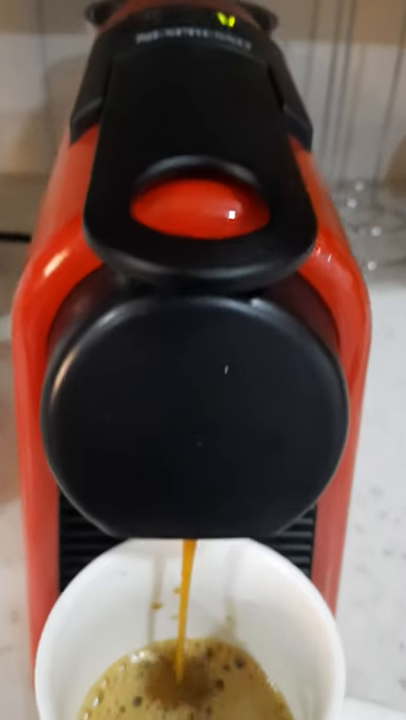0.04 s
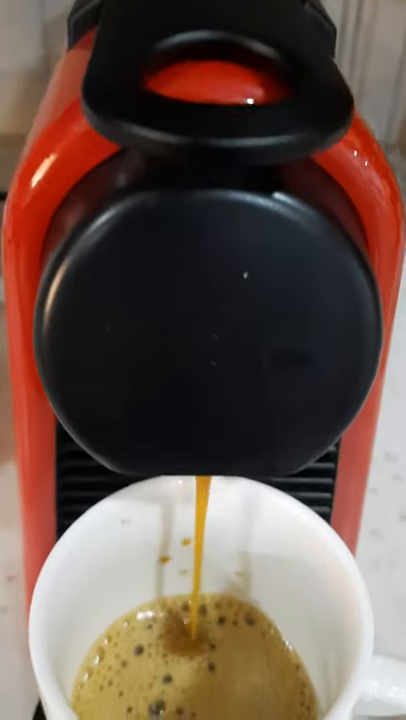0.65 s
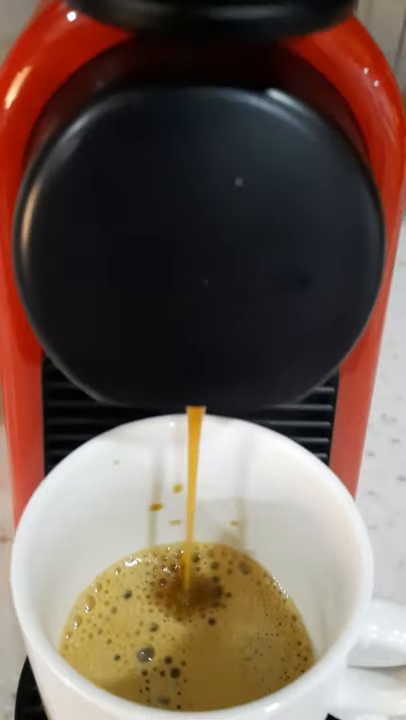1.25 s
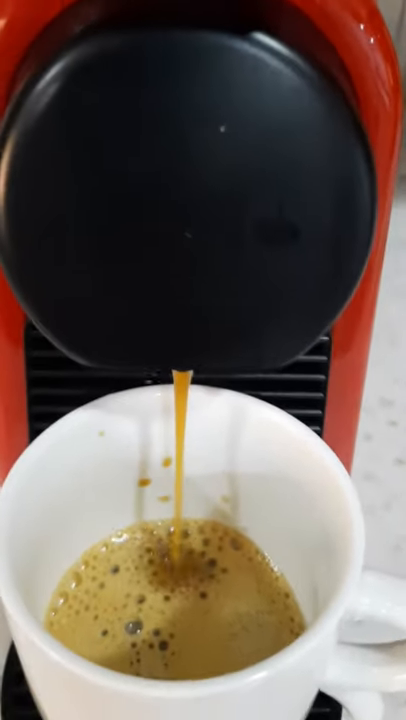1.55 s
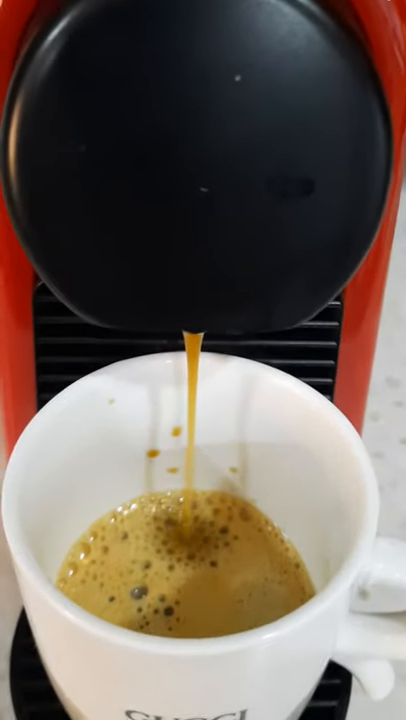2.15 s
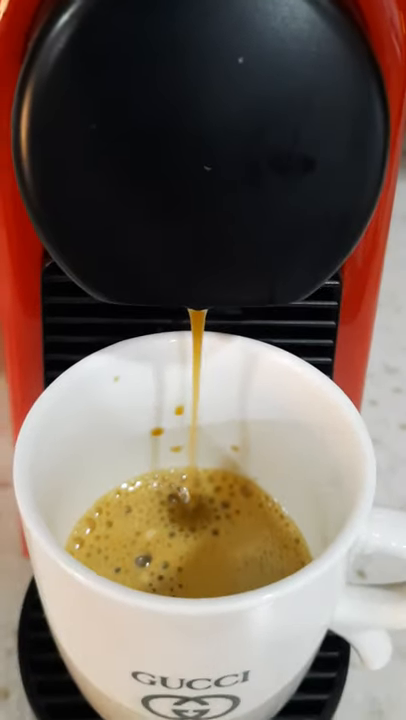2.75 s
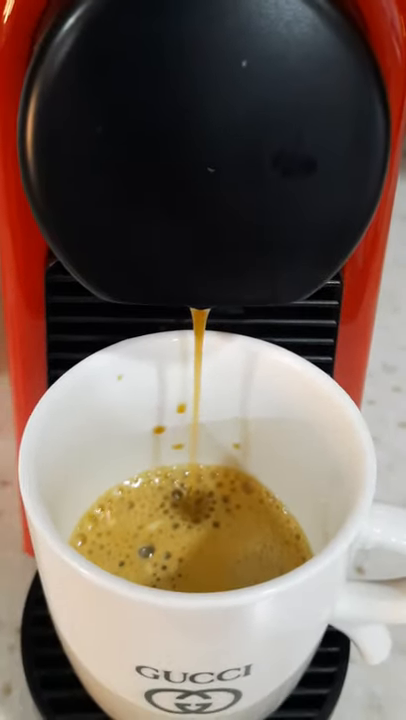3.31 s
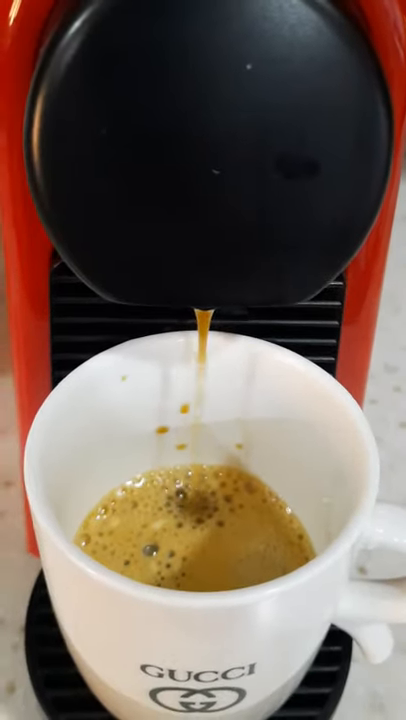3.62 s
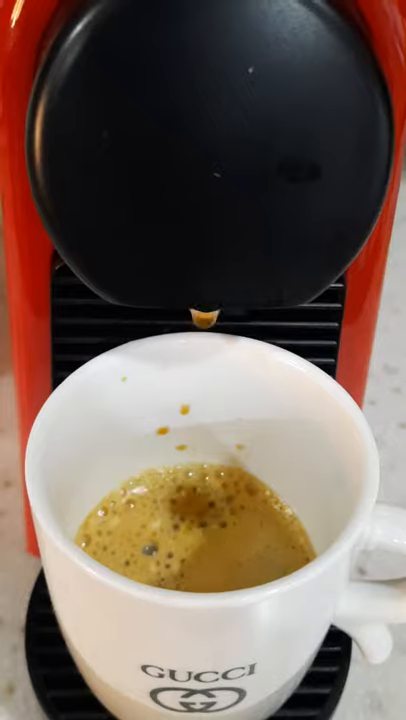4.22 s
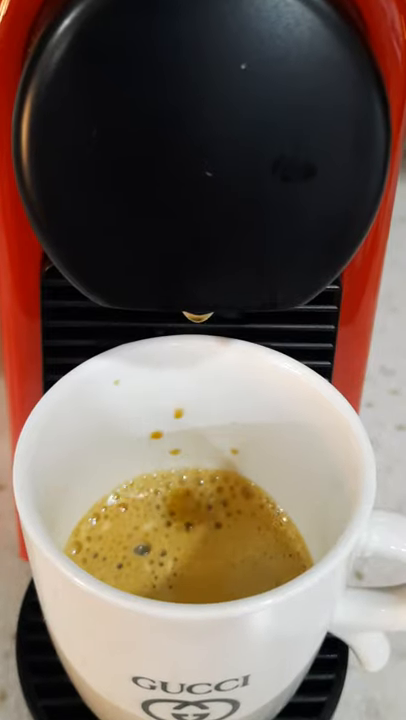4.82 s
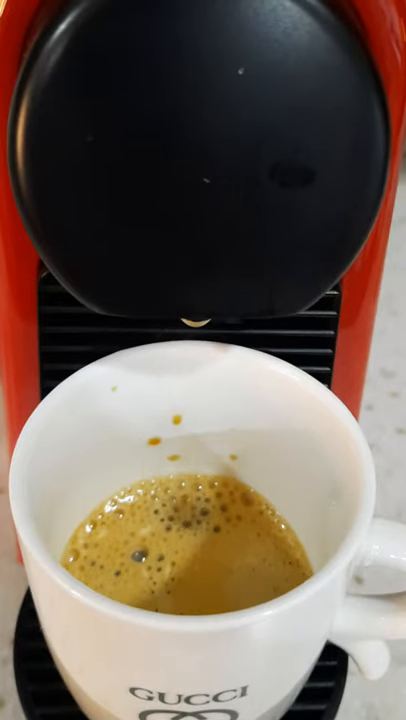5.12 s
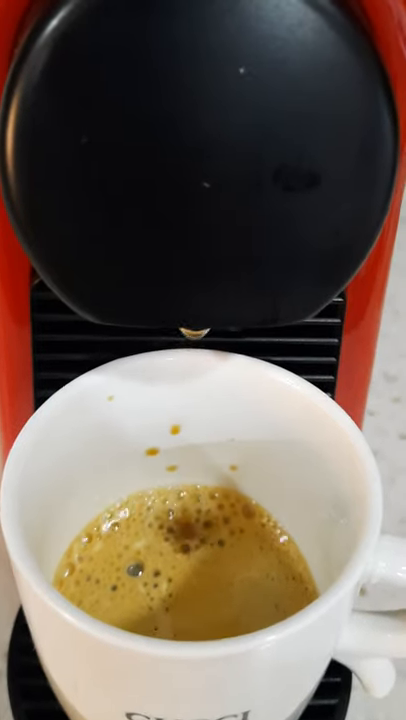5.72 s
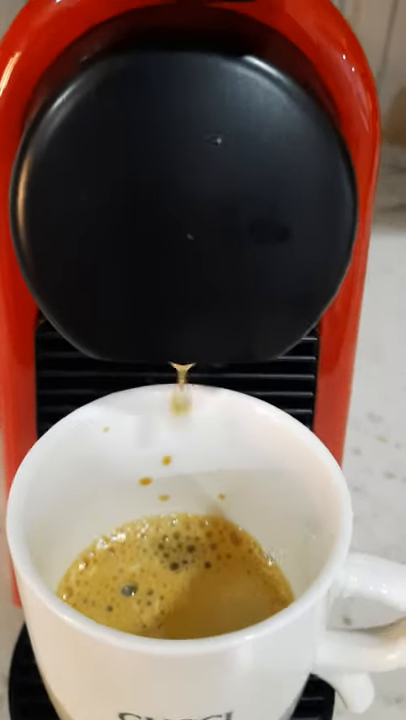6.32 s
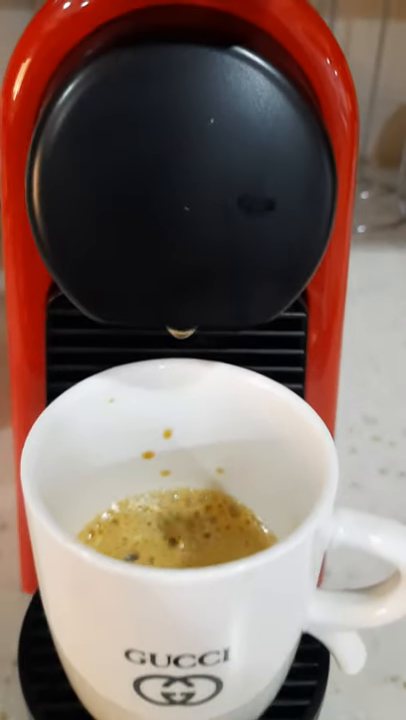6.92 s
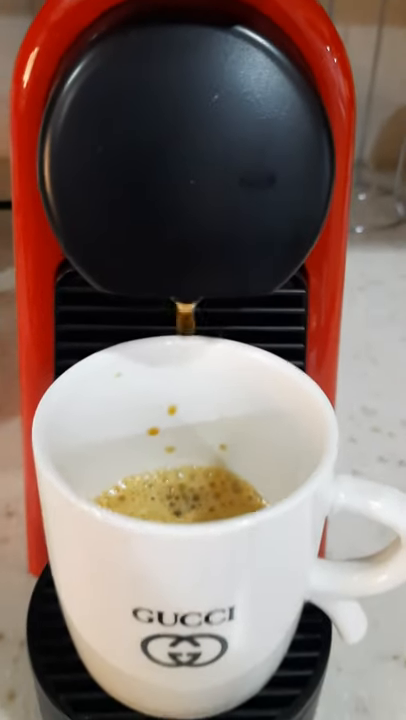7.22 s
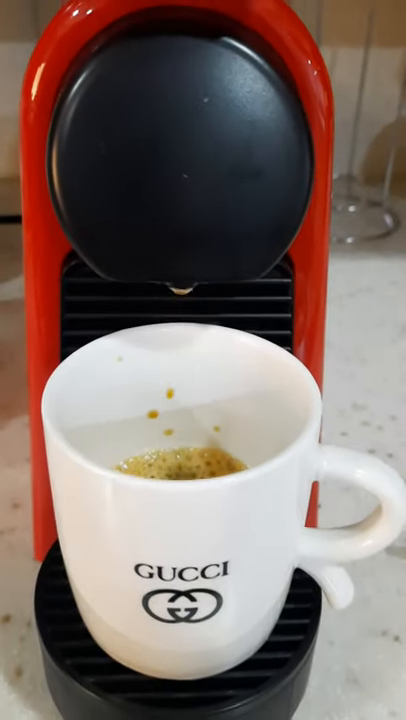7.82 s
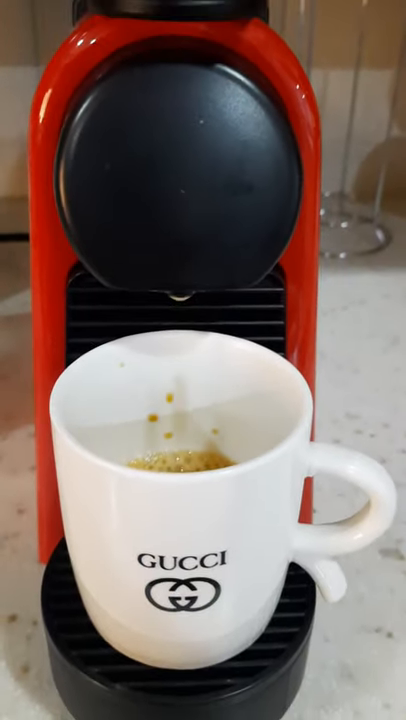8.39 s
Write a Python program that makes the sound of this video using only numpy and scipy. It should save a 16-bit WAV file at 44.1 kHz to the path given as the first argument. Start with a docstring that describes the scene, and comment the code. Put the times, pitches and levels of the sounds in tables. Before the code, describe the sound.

At the very start, a coffee machine's pump gives a split-second rattling buzz and stops, its housing ringing out briefly. Coffee keeps running into a mug close to the microphone, a light gurgling trickle with a fine fizz of foam. Bubbles burst irregularly with crisp ticks and small hollow plops, rising slightly in pitch as the mug fills. From about 2.3 seconds the stream thins and the pops become sparser and softer. The last ticks come around 3.5 seconds, and by 4 seconds the foam has fizzled out. The kitchen's ventilation is there throughout, a quiet, slightly unsteady low drone with a soft rush of air and a faint thin whine. One soft, dull bump comes from the background at about 5.4 seconds. After that only the ventilation is heard until the end, near 8.5 seconds.

```python
"""In a kitchen, a stereo microphone close to the mug of a capsule coffee machine finishing a cup.
First the pump beats four last strokes and stops, its housing ringing out. The stream runs on into the
crema, each bursting bubble ticking and ringing the air in the mug near 1 kHz, higher as it fills.
After two seconds the stream thins, and by four the foam has fizzled out. The room's ventilation, there
throughout, drones on with a thin whine; one dull bump comes past five seconds."""
import sys
import numpy as np
from scipy import signal
from scipy.fft import rfft, irfft, next_fast_len
from scipy.io import wavfile
from scipy.ndimage import map_coordinates

SR = 44100
rng = np.random.default_rng(int(sys.argv[2]) if len(sys.argv) > 2 else 0)


def file_out(sig):
    """Save sig as 16-bit WAV at sys.argv[1]."""
    # one column per channel
    cols = np.atleast_2d(sig).T
    # limit, then scale
    lim = np.clip(cols, -1, 1)
    pcm = np.round(lim * 32767).astype(np.int16)
    wavfile.write(sys.argv[1], SR, pcm)


N = 377055

# strokes of the pump's piston: (time [s], relative level [dB])
PISTON_STROKES = [(.0045, -2), (0.021, -4), (0.039, -4.5), (.0545, -26)]
# tones of the machine's housing: (frequency [Hz], level [dB], t60 [s])
HOUSING_TONES = [(57, -44.5, 0.4), (120, -26, 0.15), (174, -39.5, 0.16), (315.6, -41.5, 0.17),
                 (495, -45.5, 0.13), (1230, -37.5, 0.085)]
# the shaken casing and drip tray: (frequency [Hz], relative level [dB])
RATTLE_SPECTRUM = [(120, -34), (200, -2.5), (482, -2), (647, -15.5), (763, -1), (1250, -4), (1910, -11),
                   (3130, -11.5), (9580, -25.5), (13300, -22), (16000, -48)]
# bubbles that stand out from the stream:
# (time [s], ring level [dB], ring length [s], snap energy [dB], tick energy [dB], tick pitch [Hz])
BUBBLE_BURSTS = [(.0034, -15.5, 0.0053, -17, -11, 6330), (0.161, -36, .004, -18, -28, 6200),
                 (0.1875, -32, 0.0098, -24, -42, 3360), (0.1933, -30.5, 0.0087, -25.5, -24, 6660),
                 (.228, -30, 0.0034, -17, -24, 3400), (.3075, -49, 0.007, -34, -18, 6900),
                 (0.37, -25.5, 0.005, -18, -19.5, 4390), (0.386, -34, 0.01, -38, -25, 12960),
                 (.4145, -41, 0.01, -42, -24, 4050), (.4562, -31, 0.0045, -17.5, -14, 6540),
                 (0.528, -43, .003, -27, -15.5, 3720), (.5367, -40, 0.0058, -28, -28, 8100),
                 (.572, -41, 0.0099, -41, -20.5, 6940), (0.594, -29, 0.0047, -29, -40, 4960),
                 (0.6435, -32, 0.0031, -17.5, -19.5, 6370), (.7008, -43, 0.011, -24, -20.5, 3920),
                 (0.753, -35.5, 0.011, -21.5, -30, 4040), (.763, -37, 0.0034, -25, -26, 6460),
                 (.8493, -37.5, .005, -19, -18, 4370), (.924, -34, .009, -25.5, -21.5, 7100),
                 (0.987, -26.5, 0.0056, -15.5, -28.5, 3620), (1.0842, -30.5, 0.0055, -20, -18, 3480),
                 (1.101, -37, .005, -40, -29, 7320), (1.1603, -33.5, 0.011, -18.5, -17, 3860),
                 (1.1756, -34, 0.0073, -38, -19.5, 11500), (1.1941, -24.5, 0.0096, -15.5, -19.5, 3530),
                 (1.2402, -25.5, 0.004, -12, -20.5, 4340), (1.2912, -26.5, 0.0085, -22, -21, 11500),
                 (1.316, -36, 0.0077, -25, -29.5, 7300), (1.3772, -24, 0.01, -12.5, -19, 3700),
                 (1.4073, -33, 0.011, -18.5, -25, 3320), (1.4497, -27, 0.0091, -16, -20.5, 3400),
                 (1.5505, -40, 0.015, -24, -34, 3620), (1.586, -38.5, 0.01, -26, -37, 6160),
                 (1.6398, -43, 0.0075, -34, -10, 4170), (1.651, -39, 0.011, -35, -25, 4200),
                 (1.719, -26.5, 0.01, -20, -26, 6200), (1.7624, -24.5, 0.0095, -20.5, -22.5, 3750),
                 (1.8236, -21, 0.0094, -14, -26, 5800), (1.8423, -27.5, 0.012, -22, -22.5, 4860),
                 (1.8596, -30, 0.012, -30, -27.5, 7600), (1.9353, -32.5, 0.012, -39, -29.5, 4500),
                 (1.991, -45, .0095, -40, -20, 7400), (2.0136, -29, 0.01, -18, -12.5, 5200),
                 (2.032, -33, 0.011, -28, -22, 4350), (2.1199, -38.5, 0.012, -44, -20, 8300),
                 (2.1804, -25, 0.0094, -24.5, -32, 8830), (2.2169, -26.5, 0.01, -19.5, -19.5, 3600),
                 (2.23, -29, 0.01, -23.5, -27, 3790), (2.3306, -38.5, 0.0092, -34, -39, 4690),
                 (2.3978, -41.5, 0.013, -34, -31, 3830), (2.649, -47, .0095, -31, -30.5, 6640),
                 (2.8734, -41.5, 0.0065, -29, -34, 6240), (3.0456, -42.5, 0.0067, -48, -22.5, 7300),
                 (3.1072, -55, .008, -42, -34, 4470), (3.285, -45, 0.0044, -47, -26.5, 5100),
                 (3.3555, -55, .008, -43, -35, 6070), (3.437, -51, 0.0075, -35, -35, 4300)]
# colour of a tick leaving the mug: (frequency [Hz], relative level [dB])
TICK_SPECTRUM = [(2200, -25), (3100, -0.5), (3700, 4.5), (4150, 11.5), (4700, -1.5), (5400, -2),
                 (6500, 5.5), (7400, -11.5), (8600, -2.5), (9400, -14.5), (11200, -4.5), (13000, -8),
                 (15500, -11.5)]
# a bubble's crater closing: (frequency [Hz], relative level [dB])
SNAP_SPECTRUM = [(300, -42), (650, -2), (1000, 1), (1800, 6.5), (2300, -2), (2750, -3), (3300, -25),
                 (5000, -28)]
# the air in the mug rings higher as it fills: (time [s], pitch [Hz])
MUG_AIR_PITCH = [(0, 962), (1.4, 1000), (2.0, 1049), (2.3, 1095), (3.4, 1150)]
# the stream runs on after the pump, thins and dies away: (time [s], flow [dB])
STREAM_FLOW = [(0, -1), (.2, -5), (.6, 2.5), (.85, -3), (2.25, -5), (2.5, -15.5), (3.35, -12.5), (3.7, -33),
               (4.3, -55)]
# mug and machine at the microphone's two ports: (frequency [Hz], left minus right [dB])
PORT_SHADE = [(120, 3), (300, 1), (1000, 6), (1550, 8), (2150, 0), (3100, 13), (3800, 5), (4700, 10),
              (6500, 1), (8600, 1), (11200, 9), (15500, 3)]
# the mug's sound reaches the right port later: (frequency [Hz], lag [s])
PORT_LAG = [(700, 0.00034), (1100, 0.00019), (2100, 0.000091), (3700, 0.000087), (5500, 0.0002124),
            (12000, 0.00032)]
# the kitchen's reverberation: (frequency [Hz], t60 [s])
KITCHEN_DECAY = [(200, 0.068), (1500, 0.62), (12000, 0.022)]
# how alike diffuse sound is at the two ports: (frequency [Hz], coherence [ratio])
ROOM_COHERENCE = [(60, 0.37), (150, 0.85), (380, 0.65), (950, -0.017), (2380, 0.01), (5980, -0.9),
                  (15000, 0.27)]
# the side that diffuse sound leans to: (frequency [Hz], left minus right [dB])
ROOM_BALANCE = [(60, 0), (110, 6), (200, 1), (380, 1.0), (700, 7), (1290, -1), (2380, 6), (4400, 7.5),
                (8120, 1.5), (15000, 6)]
# the ventilation's drone: (frequency [Hz], relative level [dB])
DRONE_SPECTRUM = [(20, -46), (35, -35), (55, -19), (90, -25.5), (145, -12), (195, -21.5), (240, -13.5),
                  (262, -17), (312, 1.5), (350, -9.5), (380, -3), (420, -15), (480, -37), (650, -53)]
# its rush of air and the hiss above: (frequency [Hz], relative level [dB])
AIR_SPECTRUM = [(300, -46.5), (450, 2.5), (700, 0), (1300, 0), (1700, -7), (2200, -11), (2700, -19.5),
                (4000, -31), (5000, -37.5), (6000, -33), (6700, -26), (8600, -27), (9400, -41),
                (11200, -28), (12200, -38), (15500, -45)]

TICK_PEAK_DB, TICK_WIDTH_HZ = 9, 430  # a bubble's own short resonance
FULL_RING_S, KNOCK_RISE_OCTAVES = 0.01, 0.21  # a shorter ring is a dry knock, this much higher per halving
PITCH_SCATTER = 0.013  # relative, from ring to ring
GURGLE_DB, STRAYS_DB, FOAM_DB = -48.5, -66, -62  # at a flow of 0 dB
STRAYS_FOLLOW, FOAM_FOLLOW = 0.51, 0.58  # dB per dB of flow
DRONE_DB, DRONE_GROWS_DB_PER_S = -54.5, 0.0672
THROB_DB, THROBS_PER_S = 1.2, 7.3  # the drone's random unsteadiness
BASS_CUT_HZ, TOP_HZ = 40.0, 15900  # the microphone's band


def amp(db):
    return 10 ** (np.asarray(db) / 20)


def unit(x):
    return x / np.sqrt(np.mean(x ** 2) + 1e-20)


def along(points, hz):
    """(frequency [Hz], value) points joined on a log axis."""
    f, v = np.transpose(points)
    return np.interp(np.log(hz + 1), np.log(f + 1), v)


def curve(points, s):
    """(time [s], value) points joined by straight lines."""
    return np.interp(s, *np.transpose(points))


def wobble(rate):
    """A smooth random curve, rate knots a second."""
    return map_coordinates(rng.standard_normal(1024), [np.arange(N) * rate / SR], mode="wrap")


def filtered(x, response):
    """x through a complex response of frequency."""
    m = next_fast_len(N + SR // 2)
    return irfft(rfft(x, m) * response(np.fft.rfftfreq(m, 1 / SR)), m)[..., :N]


def click(shape, size=1024):
    """The causal click of energy 1 whose spectrum is shape(Hz) in dB."""
    cepstrum = irfft(np.log(amp(shape(np.fft.rfftfreq(size, 1 / SR))) + 1e-6))
    cepstrum[1:size // 2] *= 2
    cepstrum[size // 2 + 1:] = 0
    wave = irfft(np.exp(rfft(cepstrum)))
    return wave / np.linalg.norm(wave)


def add(track, s, sound):
    """Lay a sound into a track at time s."""
    part = track[max(round(s * SR), 0):][:len(sound)]
    part += sound[:len(part)]


def ring(hz, t60, attack):
    """A damped sine with a soft start."""
    t = np.arange(SR // 10) / SR
    return np.sin(2 * np.pi * hz * t) * amp(-60 * t / t60) * (1 - np.exp(-t / attack))


def grains(rate, spread_db):
    """Random impulses of uneven size, about rate a second."""
    hits = rng.random(N) < rate / SR
    return hits * amp(spread_db * rng.standard_normal(N).clip(-2, 2)) * rng.choice([-1, 1], N)


def port_gains(balance, hz):
    """Left and right gains that share a level difference between the microphone's ports."""
    return amp(along(balance, hz) * np.array([[.5], [-.5]]))


def rush(spectrum):
    """Diffuse stereo noise of rms 1, alike at both ports in the bass."""
    def mid_and_side(hz):
        width = np.arccos(np.sqrt(np.clip(along(ROOM_COHERENCE, hz), 0, 1))) / 2
        return amp(along(spectrum, hz)) * [np.cos(width), np.sin(width)]
    mid, side = filtered(rng.standard_normal((2, N)), mid_and_side)
    return unit(filtered(np.array([mid + side, mid - side]), lambda hz: port_gains(ROOM_BALANCE, hz)))


def pump():
    """Close by, the piston hums through the housing and rattles it at each stroke; both ring out."""
    t = np.arange(N) / SR
    onset = 1 - np.exp(-t / 0.00017)
    since_stop = np.maximum(t - .052, 0)
    hum = shake = 0
    for hz, db, t60 in HOUSING_TONES:
        tone = np.sin(2 * np.pi * (hz * t + rng.random()))
        hum += port_gains(PORT_SHADE, hz) * amp(db - 60 * since_stop / t60) * tone
    for s, db in PISTON_STROKES:
        age = abs(t - s)
        shake += (t > s) * amp(db) * (amp(-60 * age / 0.081) + amp(-18.5 - 60 * age / 0.5))
    return onset * hum + amp([[-27], [-29]]) * shake * rush(RATTLE_SPECTRUM)


def bounced(wave, share, t60):
    """A click bounces about inside the mug for a few milliseconds; its energy stays 1."""
    t = np.arange(SR // 50) / SR
    walls = rng.standard_normal(len(t)) * amp(-60 * t / t60)
    walls *= share / np.linalg.norm(walls)
    walls[0] = 1  # the direct sound
    out = np.convolve(wave, walls)
    return out / np.linalg.norm(out)


def film_tick(tick_hz):
    """A bubble's film tears with a short resonance of its own, higher for a small bubble."""
    resonance = lambda hz: TICK_PEAK_DB / (1 + ((hz - tick_hz) / TICK_WIDTH_HZ) ** 2)
    skirts = lambda hz: np.maximum(-8 * np.log2((hz + 1) / tick_hz) ** 2, -6)
    return click(lambda hz: along(TICK_SPECTRUM, hz) + resonance(hz) + skirts(hz))


def plop(hz, life, glide):
    """The mug's air rings for a few cycles, rising slightly as the crater closes."""
    t = np.arange(SR // 20) / SR
    afterglow = amp(-21 - 60 * t / .11)
    envelope = amp(-20 * (t / life) ** 2) + afterglow
    attack = 1 - np.exp(-t / .0004)
    return np.sin(2 * np.pi * hz * t * (1 + glide * (t / life - 1))) * envelope * attack


def bubbles():
    """In the crema a film tears with a tick, the crater snaps shut, and the air in the mug rings on."""
    track = np.zeros(N)
    snap = click(lambda hz: along(SNAP_SPECTRUM, hz))
    for s, ring_db, life, snap_db, tick_db, tick_hz in BUBBLE_BURSTS:
        add(track, s, amp(tick_db) * bounced(film_tick(tick_hz), share=0.82, t60=0.0089))
        add(track, s, amp(snap_db) * bounced(snap, share=0.57, t60=0.025))
        ring_hz = curve(MUG_AIR_PITCH, s) * (FULL_RING_S / life) ** KNOCK_RISE_OCTAVES
        ring_hz *= 1 + PITCH_SCATTER * rng.standard_normal()
        add(track, s, amp(ring_db) * plop(ring_hz, life, glide=0.0016))
    return track


def stray_bubbles(pitch_hz):
    """Sparse bubbles of one size tick around one pitch and echo inside the mug."""
    tick = click(lambda hz: along(TICK_SPECTRUM, hz)
                 - np.minimum(40 * np.log2((hz + 1) / pitch_hz) ** 2, 18))
    return signal.fftconvolve(grains(rate=16, spread_db=3), bounced(tick, share=.9, t60=.01))[:N]


def stream():
    """Countless smaller bubbles: a gurgle in the mug's air and a fizz of crema, fading with the flow."""
    flow_db = curve(STREAM_FLOW, np.arange(N) / SR)
    mug_air = (ring(986, 0.023, 0.00055) + ring(1194, 0.021, 0.00054)
               + amp(2.5) * ring(1930, 0.0033, 0.000099) + amp(-1.0) * ring(770, 0.012, 0.00093))
    gurgle = signal.fftconvolve(grains(rate=290, spread_db=6.5), mug_air)[:N]
    strays = sum(stray_bubbles(pitch_hz) for pitch_hz in (4300, 6300, 7800))
    bright_tick = click(lambda hz: along(TICK_SPECTRUM, hz) + 2.5 * np.log2(hz + 1))
    foam = signal.fftconvolve(grains(rate=1200, spread_db=5), bright_tick)[:N]
    return (amp(GURGLE_DB + flow_db) * unit(gurgle)
            + amp(STRAYS_DB + STRAYS_FOLLOW * flow_db) * unit(strays)
            + amp(FOAM_DB + FOAM_FOLLOW * flow_db) * unit(foam))


def from_mug(x):
    """Mug to microphone: the machine's face adds an echo; the right port hears it all late and shaded."""
    echo = lambda hz: 1 + amp(-17) * np.exp(-2j * np.pi * hz * .007)
    right = lambda hz: amp(-along(PORT_SHADE, hz)) * np.exp(-2j * np.pi * hz * along(PORT_LAG, hz))
    return filtered(x, lambda hz: echo(hz) * np.array([np.ones_like(hz), right(hz)]))


def kitchen(x):
    """The room answers with a short, dull tail, faint this close to the mug and different at each port."""
    hz, t, noise = signal.stft(rng.standard_normal((2, SR // 2)), SR, nperseg=256)
    decay = amp(-60 * t / along(KITCHEN_DECAY, hz)[:, None])
    tail = signal.istft(noise * decay, SR, nperseg=256)[1]
    reverb = signal.fftconvolve(x[None], tail / np.linalg.norm(tail[0]), axes=1)[:, :N]
    return filtered(reverb, lambda hz: amp(-21) / np.sqrt(1 + (hz / 1800) ** 2))


def ventilation():
    """Room tone: the ventilation drones unsteadily near 310 Hz over a soft rush of air."""
    drone_db = DRONE_DB + DRONE_GROWS_DB_PER_S * np.arange(N) / SR + THROB_DB * wobble(THROBS_PER_S)
    return amp(drone_db) * rush(DRONE_SPECTRUM) + amp(-56) * rush(AIR_SPECTRUM)


def whine():
    """A thin, narrow band of noise near 2.2 kHz, to the left of the microphone."""
    band = filtered(rng.standard_normal((2, N)), lambda hz: 1 / (1 + ((hz - 2202) / 10) ** 2))
    return amp(-78.0) * unit(band) * amp([[3], [-3]])


def bump():
    """One dull bump in the background: two low, damped tones, alike at both ports."""
    track = np.zeros(N)
    add(track, 5.365, amp(-49) * (ring(125, 0.13, .004) + amp(-9) * ring(62, 0.16, .004)))
    return track


def scene():
    """Pump and mug close to the microphone, with the kitchen behind them."""
    coffee = bubbles() + stream()
    room = kitchen(coffee)
    return pump() + from_mug(coffee) + room + ventilation() + whine() + bump()


def record(dry):
    """The microphone sheds the lowest bass and keeps nothing above its band limit."""
    bass_cut = lambda hz: hz ** 3 / np.sqrt(hz ** 6 + BASS_CUT_HZ ** 6)
    return filtered(dry, lambda hz: bass_cut(hz) * (hz < TOP_HZ))


dry = scene()
out = record(dry)
file_out(out)
```